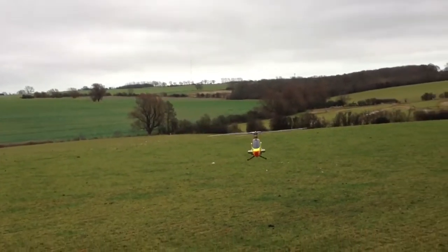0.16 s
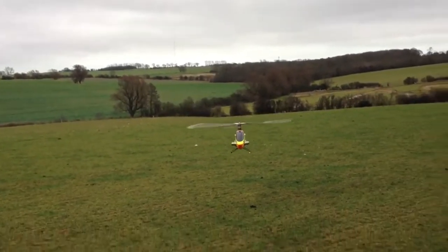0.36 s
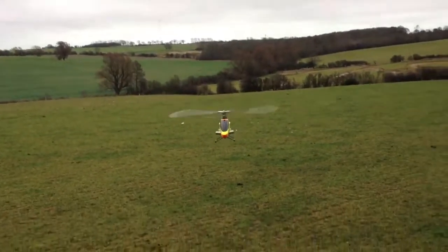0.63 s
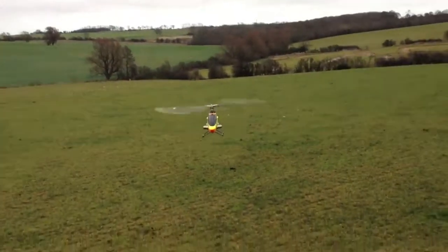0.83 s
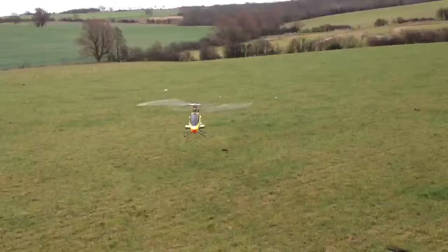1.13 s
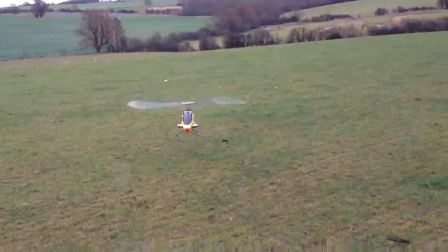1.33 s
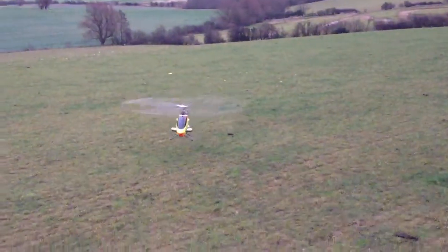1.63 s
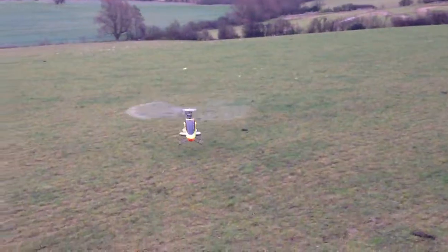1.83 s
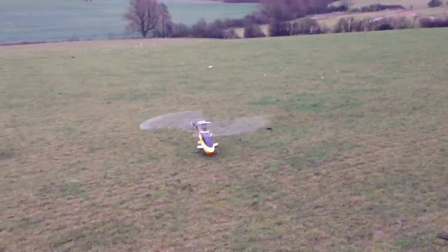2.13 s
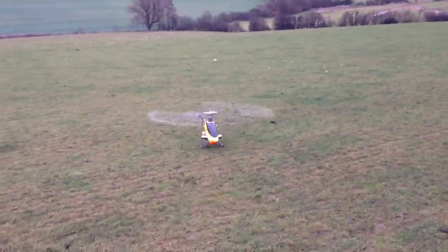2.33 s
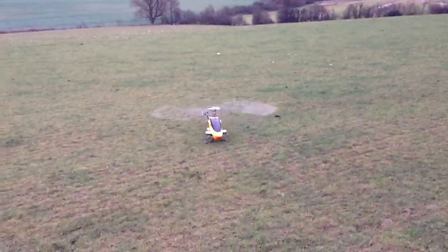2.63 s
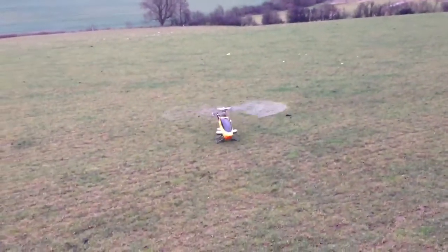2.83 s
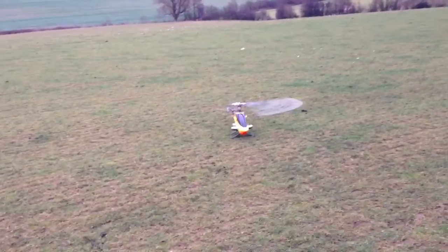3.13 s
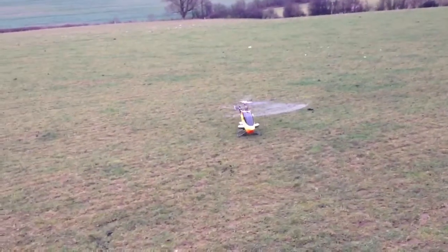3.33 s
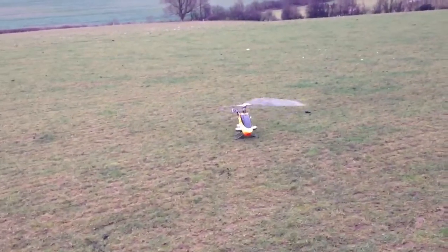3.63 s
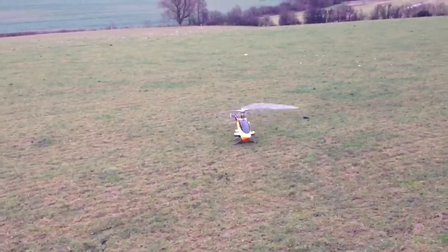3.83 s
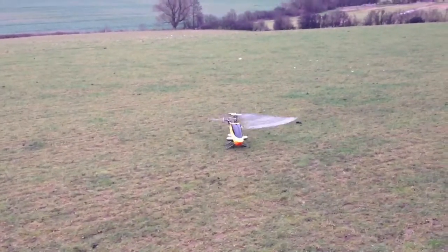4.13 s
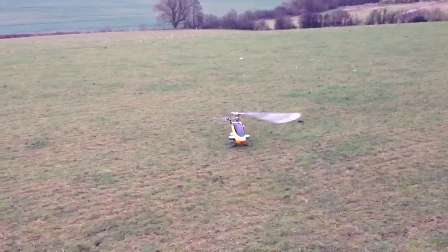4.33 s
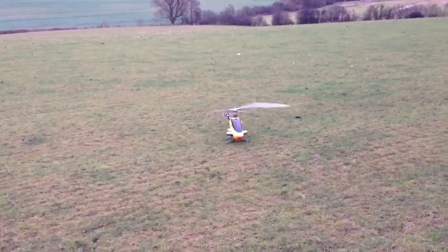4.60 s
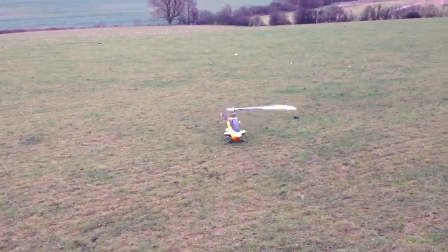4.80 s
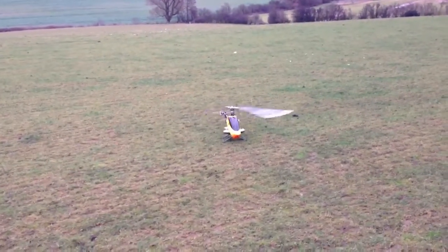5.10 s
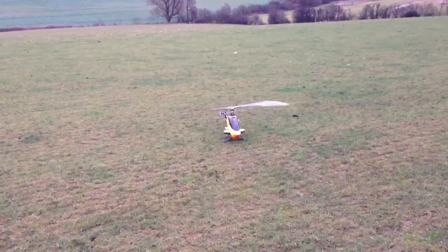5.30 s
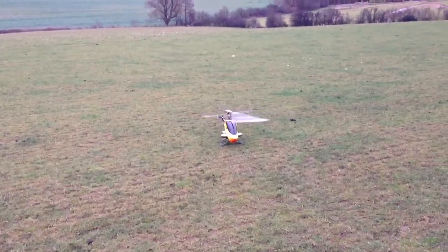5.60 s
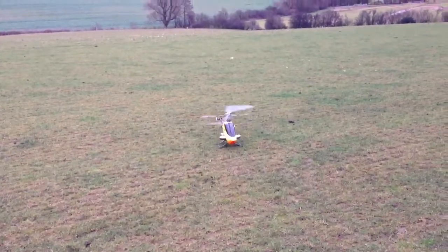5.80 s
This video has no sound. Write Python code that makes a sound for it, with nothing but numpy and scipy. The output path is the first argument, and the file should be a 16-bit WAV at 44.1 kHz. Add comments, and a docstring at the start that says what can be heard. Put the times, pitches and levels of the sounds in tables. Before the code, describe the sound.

Outdoors on an open grassy field, mono and dry, a model helicopter's turbine spools down. At 0 s a broad airy hiss is strong, carrying shrill, beading whines; the most prominent appears high and glides down, quickly in the first second, then ever more slowly. A rougher low gear whine dies by about 0.9 s. The coasting rotor gently chops the rush, slowing from roughly 65 to 25 blade passes per second, with shifting bright swishes. Around 2.6-2.9 s tiny very high pips flick past, then a short soft blade slap near 3 s. The whine swells briefly at 3-3.2 s, then is faint. Wind thumps the microphone throughout: clusters at 1.7-1.9 s, lighter until 3.4, heavy at 3.5-3.8 and 4.0-4.4 s, the sharpest crack near 4.4, where the hiss drops abruptly. To 6 s, crackly buffets and thin ticks dominate, over barely audible falling tones.

```python
"""Two turbine whines fall in pitch over a fading rush, with rotor chop and swish, wind thumps and pops.
A model helicopter's gas turbine runs down on the grass of an open field: tones locked to its two shafts,
noise for the air through its ducts, noise pulsed by the coasting two-blade rotor, short pips from its tips.
Gusty wind buffets a single microphone port: low and crackling noise, single eddies as wavelets, thin ticks."""
import sys
import numpy as np
from scipy import signal
from scipy.fft import rfft, irfft, next_fast_len
from scipy.io import wavfile
from scipy.ndimage import uniform_filter1d, map_coordinates

SR = 44100
rng = np.random.default_rng(int(sys.argv[2]) if len(sys.argv) > 2 else 0)


def materialize(psi):
    """Save the field psi as 16-bit PCM at rate SR to the path in sys.argv[1].

    A 1-D psi becomes a single channel; in a 2-D psi each row is a channel.
    """
    bounded = np.clip(np.atleast_2d(psi).T, -1, 1)
    quanta = np.round(bounded * 32767).astype(np.int16)
    wavfile.write(sys.argv[1], SR, quanta)


N = 262395
T = np.arange(N) / SR
TOP_HZ = 15450  # band limit

# air through the engine and swish of the rotor tips; both drop abruptly near 4.38 s:
# t/s, rush gain/dB, swish gain/dB, swish chop/0-1
AIR = [(0, -33, -37, 0.03), (.44, -33, -54, 0.2), (.66, -34.5, -48, 0.1), (.9, -36, -60, 0.35),
       (1.54, -38.5, -54, 0.2), (1.76, -39.5, -49, 0.4), (2.0, -39.5, -55, 0.4), (2.2, -42.5, -51, 0.2),
       (2.42, -44, -60, 0.1), (2.64, -45, -50.5, 0.17), (2.9, -44, -52.5, 0.2), (3.3, -45.5, -48.5, 0.27),
       (3.55, -45.5, -64, 0.1), (3.96, -48, -69, 0), (4.378, -53.5, -67, 0.1), (4.39, -58.5, -79, 0.1),
       (5.0, -55, -65, 0.1), (5.5, -56, -82, 0.2), (5.95, -58.5, -81, .2)]
# spectrum of the sharp wind crackle: f/Hz, density/dB
CRACKLE_SPECTRUM = [(300, 6), (600, 12), (900, 1.5), (1500, -6.5), (2500, -23.5), (4000, -31), (8000, -51)]


def amp(db):
    """Amplitude factor of a level in dB."""
    return 10 ** (np.asarray(db) / 20)


def unit(x):
    """x scaled to rms 1."""
    return x / np.sqrt(np.mean(x ** 2) + 1e-20)


def curves(rows):
    """One value per sample for each column after the time, joined linearly."""
    s, *cols = np.transpose(rows)
    return [np.interp(T, s, c) for c in cols]


def wobble(knots_per_s):
    """A smooth random curve through normal deviates."""
    knots = rng.standard_normal(int(N * knots_per_s / SR) + 4)
    return map_coordinates(knots, [T * knots_per_s])


def filtered(x, response):
    """x with its spectrum multiplied by a zero-phase response of frequency."""
    m = next_fast_len(N + 8192)
    return irfft(rfft(x, m) * response(np.fft.rfftfreq(m, 1 / SR)), m)[:N]


def shape(points):
    """Response through (Hz, dB) points on a log frequency axis."""
    f, db = np.transpose(points)
    return lambda hz: amp(np.interp(np.log(hz + 1), np.log(f + 1), db))


def steep_band(centre_hz, width_hz):
    """Response of one steep-sided resonance, peak 1."""
    return lambda hz: 1 / (1 + (2 * (hz - centre_hz) / width_hz) ** 4)


def noise(response):
    """Coloured noise of rms 1."""
    return unit(filtered(rng.standard_normal(N), response))


def wavelet(t, hz, cycles, turn):
    """A push and rebound under a Gaussian bell; turn is the phase in radians."""
    return np.exp(-(t * hz / cycles) ** 2) * np.cos(2 * np.pi * hz * t + turn)


def tone(hz, db, flutter_db, blur_hz):
    """A gliding sine; moving air scatters it into beads, faster at high pitch; silent above the band limit."""
    scatter, beats_per_khz = .3, 3  # scattered re direct; beats a second per kHz of pitch
    phase = 2 * np.pi * np.cumsum(hz + blur_hz * wobble(120)) / SR
    beats = np.cumsum(beats_per_khz * np.minimum(hz, TOP_HZ) / 1000 + 8) / SR
    in_phase, quadrature = [map_coordinates(rng.standard_normal(int(beats[-1]) + 4), [beats]) for _ in "ab"]
    beads = np.hypot(1 + scatter * in_phase, scatter * quadrature)
    flutter = amp(flutter_db * np.clip(hz / 8000, .4, 1.6) * wobble(160))
    return np.sqrt(2) * amp(db) * unit(flutter * beads) * np.sin(phase) * (hz < TOP_HZ)


def whine():
    """Tones locked to the two coasting shafts, whose periods lengthen almost steadily."""
    # run-down: t/s, compressor base tone f/Hz, power turbine blade tone f/Hz
    shafts = [(0, 8749.7, 19881.9), (.3, 7051.1, 17175), (.6, 5823.1, 15038.2), (1.05, 4575.1, 12589.2),
              (1.5, 3739.3, 10769.5), (2.2, 2873.2, 8735.1), (3.25, 2091.1, 6727), (4.3, 1613.1, 5389.4),
              (5.35, 1295.1, 4428.1), (5.95, 1154, 3982.1)]
    # t/s, compressor base level/dB, power turbine gear whine level/dB
    early = [(0, -60, -37), (.06, -41, -36), (.11, -38, -35), (.17, -50, -44), (.22, -56, -38),
             (.26, -66, -32), (.31, -66, -36), (.36, -33.5, -37), (.41, -53, -49), (.46, -52, -46),
             (.51, -66, -41.5), (.61, -62, -34.5), (.67, -68, -42), (.74, -70, -52), (.85, -80, -70),
             (1.3, -90, -85)]
    # main whines: t/s, 2x base level/dB, 4x base level/dB, blade tone level/dB
    main = [(0.18, -32, -45, -43), (0.25, -24, -45, -43), (0.32, -28, -45, -43), (0.39, -21.5, -45, -43),
            (0.46, -29, -45, -43), (0.53, -38, -45, -48), (0.6, -31, -45, -43), (0.67, -33, -45, -46),
            (0.74, -32, -45, -41), (0.81, -35, -45, -42), (0.88, -27.5, -45, -45), (0.95, -34.5, -45, -50),
            (1.02, -30, -45, -50), (1.09, -36.5, -45, -52), (1.16, -30.5, -45, -49),
            (1.23, -31.5, -45, -51), (1.3, -32.5, -45, -47), (1.37, -33, -45, -46), (1.44, -32, -47, -56),
            (1.51, -33.5, -40, -44), (1.58, -41, -46, -51), (1.65, -39, -43, -46), (1.72, -44.5, -46, -52),
            (1.79, -30, -42, -54), (1.86, -38, -47, -58), (1.93, -29, -49, -56), (2.0, -38, -34, -54),
            (2.07, -39, -41, -52), (2.14, -43.5, -48, -51), (2.21, -39, -53, -49), (2.28, -40.5, -43, -54),
            (2.35, -45, -50, -62), (2.42, -47, -63, -50), (2.49, -38.5, -64, -50), (2.56, -50, -71, -56),
            (2.63, -50, -58, -61), (2.7, -54, -72, -80), (2.77, -50, -62, -61), (2.84, -45, -55, -61),
            (2.91, -54, -58, -60), (2.98, -43, -50, -53), (3.05, -41, -53, -49), (3.12, -40, -57, -53),
            (3.19, -44.5, -56, -58), (3.26, -50, -50, -54), (3.33, -60, -58, -51), (3.45, -65, -59, -59),
            (3.6, -68, -65, -80), (3.75, -72, -61, -74), (3.9, -67, -61, -68), (4.05, -62, -56, -61),
            (4.2, -64, -59, -63), (4.35, -65, -66, -69), (4.5, -64, -71, -80), (4.65, -60, -69, -76),
            (4.8, -70, -76, -76), (4.95, -70, -74, -71), (5.1, -67, -71, -70), (5.25, -67, -73, -71),
            (5.4, -77, -80, -76), (5.55, -66, -77, -67), (5.7, -72, -75, -67), (5.85, -79, -77, -82),
            (5.93, -80, -75, -75)]
    # moments when the 2x tone cancels: t/s, length/ms, depth/dB
    dips = [(0.171, 9, 24), (0.251, 15, 24), (0.297, 4.4, 12), (0.331, 13, 11), (0.379, 16, 19),
            (0.423, 16, 11), (0.484, 7, 23), (0.539, 10, 24), (0.566, 6.5, 17), (0.61, 6, 18),
            (0.733, 12, 23), (0.819, 12, 24), (0.881, 12, 10), (0.957, 9.4, 15), (1.08, 5.9, 24),
            (1.162, 13, 18), (1.401, 55, 12), (1.573, 12, 19), (1.753, 8, 13), (1.865, 14, 24),
            (2.0, 35, 16), (2.924, 11, 24), (3.368, 17, 16)]
    # perhaps a bearing, at 2.314x base: t/s, level/dB, its octave level/dB
    bearing = [(4.4, -85, -85), (5.0, -76, -78), (5.28, -74, -77), (5.38, -63, -71), (5.5, -65, -74),
               (5.6, -59, -64), (5.7, -67, -66), (5.8, -63, -68), (5.88, -57, -66), (5.95, -55, -64)]
    # brief tones, perhaps of the same bearing: t/s, 1.543x base level/dB, 5.333x base level/dB
    brief = [(3.6, -80, -85), (3.67, -55, -83), (3.84, -57, -84), (3.9, -72, -85), (4.0, -62, -80),
             (4.1, -82, -80), (4.4, -85, -88), (4.65, -85, -82), (4.95, -85, -74), (5.1, -85, -80),
             (5.25, -88, -75), (5.4, -87, -68), (5.47, -85, -58), (5.55, -85, -62), (5.65, -85, -81),
             (5.9, -85, -70)]
    # clearer sidebands: t/s, level/dB at 3.79x, 3.922x, 5.469x, 7.01x base
    sidebands = [(3.0, -80, -85, -85, -90), (3.3, -66, -75, -76, -84), (3.45, -62, -82, -79, -84),
                 (3.6, -69, -64, -80, -67), (3.75, -66, -62, -83, -67), (3.9, -73, -60, -78, -70),
                 (4.05, -73, -70, -78, -74), (4.2, -79, -67, -78, -78), (4.35, -75, -69, -76, -79),
                 (4.5, -84, -74, -83, -86), (4.65, -79, -72, -73, -82), (4.8, -79, -77, -86, -86),
                 (4.95, -75, -75, -82, -85), (5.1, -78, -77, -80, -81), (5.25, -86, -82, -71, -77),
                 (5.4, -82, -76, -69, -78), (5.55, -82, -80, -73, -76), (5.7, -69, -85, -80, -71),
                 (5.95, -84, -80, -79, -80)]
    # weak overtones of the bearing and their sidebands: multiple of base, level/dB re rush before emergence
    faint = [(3.017, -25), (3.085, -22), (3.15, -22), (4.562, -22), (4.693, -21), (5.402, -24),
             (6.107, -23), (6.242, -22), (6.88, -24), (7.644, -30), (7.781, -29)]
    # the weak overtones show once the rush has faded: t/s, gain/dB
    emerge = [(3.0, -14), (3.6, -5), (4.4, 2), (5.95, 3)]
    fade_db, fades_per_s = 1.2, 14  # wind between engine and listener makes each main whine swell and sink
    flutter_db = 1.6  # quick shake at 8 kHz
    blur_from_s, blur_hz_per_s = 4.3, 14  # the slow blade tone grows fuzzy

    s, *speeds = np.transpose(shafts)
    # smooth run-down: polynomial through the periods
    base_hz, blade_hz = [1 / np.polyval(np.polyfit(s, 1 / speed, 7), T) for speed in speeds]
    second_db, fourth_db, blade_db = [db + fade_db * wobble(fades_per_s) for db in curves(main)]
    second_db = second_db - sum(db * np.exp(-((T - s) * 2500 / ms) ** 2) for s, ms, db in dips)
    first_db, gear_db = curves(early)

    orders = [1, 2, 4, 2.314, 4.628, 1.543, 5.333, 3.79, 3.922, 5.469, 7.01]
    levels_db = [first_db, second_db, fourth_db, *curves(bearing), *curves(brief), *curves(sidebands)]
    base_locked = sum(tone(k * base_hz, db, flutter_db, blur_hz=4.94) for k, db in zip(orders, levels_db))
    faint_db = curves(AIR)[0] + curves(emerge)[0]
    overtones = sum(tone(k * base_hz, faint_db + db + 3 * wobble(5), flutter_db=1.5, blur_hz=4)
                    for k, db in faint)
    blade_blur_hz = 3.9 + blur_hz_per_s * np.clip(T - blur_from_s, 0, None)
    blades = tone(blade_hz, blade_db, flutter_db, blade_blur_hz)
    gear = tone(.1335 * blade_hz, gear_db, flutter_db, blur_hz=26.6)
    return base_locked + overtones + blades + gear


def blade_pulse(sharp, uneven):
    """One bump per blade pass, mean 1, slowing as the rotor coasts; one of the two blades is louder."""
    pass_ms = 15.353 + 3.989 * T + .247 * T ** 2
    facing_s = 2.698  # the louder blade points at the listener
    passes = np.cumsum(1000 / pass_ms) / SR
    angle = 2 * np.pi * (passes - passes[int(facing_s * SR)])
    bump = np.exp(sharp * np.cos(angle)) * (1 + uneven * np.cos(angle / 2))
    return bump / bump.mean()


def air():
    """Engine rush through its ducts, chopped by the rotor; the tips swish and slap once per pass."""
    # rush before the ducts: f/Hz, density/dB
    rush_spectrum = [(530, -43), (900, -6.5), (1290, -4), (1670, -5), (2510, 3), (3540, -9.5), (4330, -8),
                     (5910, -7.5), (6650, -13), (7410, -9), (8440, -9.5), (9740, -16), (11000, -14.5),
                     (13400, -10.5), (15500, -27)]
    # intake and shell resonances: f/Hz, width/Hz, gain/dB
    duct_peaks = [(2356, 380, -4.5), (4390, 980, 3), (6720, 800, 4.5), (8460, 1040, 0)]
    # dips in the rush: f/Hz, width/Hz
    valleys = [(1760, 460), (3560, 1200)]
    # t/s, share taken/0-1 by each dip
    valley_depth = [(1.9, 0, 0), (2.2, .3, 0.0019), (3.4, .3, 0.1), (3.6, .05, .05), (4.37, .05, .1),
                    (4.4, .05, .4)]
    # swish before tilting: f/Hz, density/dB
    swish_spectrum = [(5000, -13), (8000, 22), (11000, 10.5), (14000, 0), (16000, -1)]
    # the swish is brighter, then duller: t/s, top gain/dB (bottom gets the opposite)
    swish_tilt = [(2.3, 3), (2.7, 9), (2.95, 6), (3.2, -3.5), (3.6, 1)]
    # blades slap their own wake: t/s, level/dB
    slap_level = [(0, -42.5), (2.2, -49.5), (2.9, -70), (2.96, -41), (3.06, -44.5), (3.15, -52), (3.6, -87)]
    # f/Hz, density/dB
    slap_spectrum = [(500, 0.5), (1100, 1.5), (2500, -8.5), (3600, -10.5), (6000, -34)]
    rush_chop = .12  # share of the rush that the rotor chops
    rush_db, swish_db, swish_chop = curves(AIR)

    def ducts(hz):
        return amp(sum(db / (1 + (2 * (hz - c) / w) ** 2) for c, w, db in duct_peaks))

    rush = noise(lambda hz: shape(rush_spectrum)(hz) * ducts(hz))
    rush *= amp(.6 * wobble(9))
    for c, w, db in duct_peaks:  # each resonance also flares on its own
        flare = amp(db - 16 + 3.2 * wobble(14))
        rush += flare * noise(steep_band(c, w))
    for (c, w), depth in zip(valleys, curves(valley_depth)):
        rush -= depth * filtered(rush, steep_band(c, w))
    rush *= 1 + rush_chop * (blade_pulse(sharp=1.27, uneven=.059) - 1)

    tilt_db = curves(swish_tilt)[0]
    swish = 0
    # bands wander separately, so the colour of the swish keeps changing
    for c, db in zip((8000, 11000, 14000), (-tilt_db, -1.5, tilt_db)):
        band = noise(lambda hz: shape(swish_spectrum)(hz) / (1 + ((hz - c) / 1500) ** 2))
        swish = swish + band * amp(db + 3.3 * wobble(35.7))
    swish = unit(swish) * (1 + swish_chop * (blade_pulse(sharp=3, uneven=.31) - 1))

    slap = unit(noise(shape(slap_spectrum)) * blade_pulse(sharp=2.5, uneven=.056))
    return amp(rush_db) * rush + amp(swish_db) * swish + amp(curves(slap_level)[0]) * slap


def gusts():
    """Gains of buffet and crackle: every gust rises, holds and dies away, adding power to the calmer wind."""
    # wind on the port between gusts: t/s, level/dB before trim, crackle/dB re that level
    calm = [(0.0, -27, -3.5), (0.4, -27.5, -21), (1.76, -22.5, -38), (2.17, -24, -16), (2.53, -23.5, -20),
            (3.12, -27, -31), (3.61, -24.5, -12), (3.98, -22.5, -12.5), (4.24, -30, -19), (4.54, -26, -4),
            (5.6, -22.5, -25), (5.95, -20.5, -8.5)]
    # start of hold t/s, hold/s, level/dB before trim, crackle/dB re that level
    gust_rows = [(0.128, 0.036, -15.5, -14), (0.186, 0.073, -20, -10), (0.35, 0.012, -19, -15),
                 (0.53, 0.043, -18.5, -16), (0.702, 0.031, -16, -14), (1, 0.015, -19, -19),
                 (1.045, 0.025, -25, -31), (1.116, 0.14, -22, -10), (1.283, 0.0087, -25, 3.5),
                 (1.344, 0.041, -21, -3.5), (1.4, 0.038, -18.5, -22), (1.475, 0.048, -26, -18),
                 (1.527, 0.021, -19, -10), (1.634, 0.023, -19, -20), (1.675, 0.06, -16, -21),
                 (1.79, 0.028, -25, -20), (1.811, 0.047, -14, -18), (1.928, 0.066, -20.5, -18),
                 (2.223, 0.031, -25, -27), (2.279, 0.032, -18.5, -29), (2.374, 0.038, -23.5, -19),
                 (2.607, 0.044, -17, -21), (2.736, 0.031, -21.5, -21), (3.35, 0.048, -22, -33),
                 (3.486, 0.078, -18.5, -25), (3.62, 0.051, -17, -11), (3.677, 0.086, -14, -13),
                 (3.882, 0.027, -17, -17), (3.91, 0.013, -29, -12), (4.062, 0.073, -14.5, -11.5),
                 (4.162, 0.02, -15, -17), (4.217, 0.11, -14, -19), (4.354, 0.035, -20, -18),
                 (4.393, 0.061, -18.5, -9.5), (4.533, 0.07, -18, -14), (4.607, 0.022, -17, -17),
                 (4.686, 0.057, -15.5, -7.5), (4.813, 0.041, -19.5, -6), (4.96, 0.1, -18, -6.5),
                 (5.045, 0.036, -19.5, -14), (5.108, 0.028, -16.5, -13), (5.18, 0.037, -16.5, -3.5),
                 (5.234, 0.027, -22, -1), (5.316, 0.076, -21, -6), (5.444, 0.051, -16.5, -28),
                 (5.504, 0.078, -17.5, -14), (5.609, 0.12, -20, -9), (5.885, 0.2, -26.5, -4)]
    rise_s, crackle_rise_s, fall_s = .014, .004, .013  # crackle sets in more sharply
    calm_db, calm_crackle_db = curves(calm)
    buffet_power = amp(calm_db) ** 2
    crackle_power = amp(calm_db + calm_crackle_db) ** 2
    for s, hold_s, db, crackle_db in gust_rows:
        fall = np.exp(-np.clip(T - s - hold_s, 0, None) / fall_s)
        slow, quick = [np.clip((T - s) / rise + 1, 0, 1) * fall for rise in (rise_s, crackle_rise_s)]
        buffet_power = buffet_power + (amp(db) * slow) ** 2
        crackle_power = crackle_power + (amp(db + crackle_db) * quick) ** 2
    return np.sqrt(buffet_power), np.sqrt(crackle_power)


def wind():
    """Eddies roll over the port in lumps above a steadier roar; strong ones can carry a sharp crackle."""
    # f/Hz, density/dB
    buffet_spectrum = [(53, -46), (90, -13), (162, 3), (285, -2), (473, -6.5), (794, -17.5), (894, -23.5),
                       (1190, -29.5), (1500, -38), (1950, -71), (3300, -120)]
    # steadier roar: f/Hz, density/dB
    roar_spectrum = [(20, -7), (40, 0.5), (80, 0.5), (130, 4), (200, 12), (350, 1), (600, -57), (1200, -68)]
    strength, sharpness = gusts()
    lumps, fine = wobble(40), wobble(110)
    buffet = unit(amp(2.4 * lumps + 2.8 * fine) * noise(shape(buffet_spectrum)))
    spikes = np.minimum(wobble(300), 1.7)
    crackle = unit(amp(.69 * lumps + 4.3 * fine + 6.5 * spikes) * noise(shape(CRACKLE_SPECTRUM)))
    roar = uniform_filter1d(strength, size=SR // 2) * noise(shape(roar_spectrum))
    return amp(-5.5) * strength * buffet + amp(-4.5) * sharpness * crackle + amp(-10) * roar


def pops():
    """Single eddies thump the port and snap with a rough broad edge; lesser snaps fall at random."""
    # strongest eddies: t/s, thump/dB, thump f/Hz, snap/dB re thump, bright edge/dB re thump
    eddies = [(0.077, -13.5, 358, -5.5, -39), (0.152, -7.5, 270, -15.5, -42), (0.201, -8.5, 235, -26, -42),
              (0.219, -12, 245, -15, -42), (0.234, -23, 293, -12, -17), (0.373, -11.5, 255, -13, -42),
              (0.533, -21.5, 304, 1, -29), (0.54, -19.5, 321, 4, -30), (0.552, -12.5, 329, -16, -42),
              (0.735, -10, 257, -10, -42), (0.754, -10.5, 260, -21, -42), (1.067, -8, 225, -34, -42),
              (1.127, -9.5, 343, -5, -42), (1.135, -9, 218, -14, -42), (1.191, -8.5, 248, -26, -42),
              (1.284, -12.5, 300, -4, -12), (1.293, -13, 270, -4.5, -22), (1.365, -7, 293, 1.5, -11),
              (1.376, -5, 295, -17, -42), (1.656, -19, 270, -28, -42), (1.675, -9, 295, -17, -23),
              (1.686, -2.5, 377, -3.5, -22), (1.696, -4, 185, -9, -42), (1.708, -6, 246, -1, -11),
              (1.811, -10, 368, -24, -30), (1.822, -16, 240, -16, -42), (1.835, -10.5, 240, -2, -42),
              (1.843, -6, 330, -9, -25), (1.846, -10, 252, 0, -29), (1.853, -10, 217, -17, -42),
              (1.86, -16, 312, -16, -42), (1.963, -6.5, 216, -23, -42), (1.972, -10.5, 250, -14, -38),
              (2.015, -13, 200, -20, -36), (2.047, -10.5, 344, -14, -42), (2.126, -12.5, 215, -11.5, -36),
              (2.154, -18, 240, -20, -36), (2.233, -13.5, 200, -25, -40), (2.254, -11, 240, -24, -40),
              (2.289, -9.5, 260, -20, -42), (2.306, -15, 260, -11, -32), (2.376, -15, 210, -13, -36),
              (2.45, -15, 260, -18, -40), (2.506, -16, 200, -14, -38), (2.53, -11, 261, -20, -40),
              (2.589, -13, 280, -24, -40), (2.629, -14, 330, -11, -34), (2.708, -15, 229, -15, -40),
              (2.764, -11, 282, -12, -34), (2.803, -17.5, 260, -13, -38), (2.903, -15.5, 240, -22, -40),
              (3.048, -9.5, 190, -26, -42), (3.121, -15, 276, -16, -40), (3.202, -13, 237, -22, -42),
              (3.294, -12.5, 258, -33, -38), (3.394, -12, 199, -22, -40), (3.466, -8.5, 313, -32, -42),
              (3.485, -2, 255, -11, -40), (3.513, -8, 280, -24, -42), (3.528, -4, 270, -15, -41),
              (3.541, -14, 217, -31, -44), (3.558, -6, 301, -19, -42), (3.577, -5.5, 316, -12.5, -38),
              (3.585, -3, 313, -20, -42), (3.633, -13, 266, -17, -42), (3.643, -9.5, 258, 4, -5),
              (3.648, -5, 273, -15, -26), (3.674, -5, 314, -13, -27), (3.687, -16, 280, -8, -42),
              (3.698, -8, 280, -10, -42), (3.711, -6.5, 215, -20, -42), (3.723, -5, 313, -14, -42),
              (3.735, -25.5, 292, 7.5, -42), (3.744, -15, 261, -1, -34), (3.75, -15, 269, -19, -42),
              (3.765, -14.5, 348, -3.5, -31), (3.925, -8, 240, -12, -30), (3.938, -16.5, 251, -4.5, -30),
              (4.026, -17, 215, -4, -30), (4.06, -12.5, 247, -6.5, -42), (4.078, -10, 238, -5.5, -35),
              (4.1, -10, 339, -12, -26), (4.104, -6, 254, -17, -26), (4.108, -9, 238, -5, -42),
              (4.12, -11.5, 317, -4, -16), (4.124, -6, 280, -11, -27), (4.131, -6.5, 305, -14, -40),
              (4.157, -14, 257, -22, -38), (4.163, -4.5, 279, -15, -40), (4.218, -1.5, 258, -7, -25),
              (4.224, -5, 246, -26, -42), (4.24, -19, 236, -18, -42), (4.245, -13.5, 256, -11, -17),
              (4.264, -10, 283, -28, -42), (4.271, -10, 262, -12, -42), (4.284, -6.5, 278, -26, -42),
              (4.293, -4.5, 256, -16, -28), (4.304, -15, 322, -9, -42), (4.315, -16, 286, -19, -42),
              (4.348, -2.5, 292, -11, -26), (4.354, -17, 278, 2, -30), (4.364, -10, 387, 1.5, -10),
              (4.37, -13, 354, -3, -25), (4.375, -1.5, 292, -3.5, -11.5), (4.381, -4, 284, -1.5, -8),
              (4.385, -16, 231, -10, -10), (4.393, -13, 254, -15, -36), (4.477, -11.5, 244, -13, -42),
              (4.582, -13.5, 378, -4, -12), (4.63, -9.5, 263, -26, -42), (4.687, -9.5, 408, -8, -22),
              (4.698, -16, 313, -12, -35), (4.705, -13.5, 216, 0, -24), (4.726, -13.5, 401, -5.5, -23),
              (4.737, -12, 246, -19, -42), (4.825, -3.5, 240, -16.5, -34), (4.968, -11, 430, -2, -14),
              (4.985, -7.5, 257, -6.5, -29), (4.988, -16, 255, -7, -33), (5.015, -12.5, 292, -22, -35),
              (5.074, -11, 318, -10, -44), (5.079, -14.5, 231, -12, -37), (5.085, -20, 232, -15, -42),
              (5.098, -9.5, 330, -14, -42), (5.104, -10, 337, -11, -36), (5.117, -10.5, 350, -7, -39),
              (5.122, -15, 291, -7, -32), (5.137, -12.5, 253, -14, -42), (5.187, -13, 237, -18, -18),
              (5.205, -5, 330, -7, -16.5), (5.217, -12, 244, -12, -19), (5.231, -12, 332, -2.5, -25),
              (5.241, -10, 290, -11, -44), (5.244, -8.5, 235, -11, -32), (5.267, -16.5, 364, -4, -19),
              (5.334, -13, 215, -13, -28), (5.36, -12, 232, -11, -29), (5.425, -18, 200, -10, -30),
              (5.457, -14, 339, -8, -42), (5.478, -12, 302, -21, -42), (5.495, -13, 320, -4.5, -30),
              (5.508, -13, 224, -19, -42), (5.518, -7.5, 241, -22, -42), (5.526, -12, 252, -14, -42),
              (5.538, -19.5, 272, 2.5, -26), (5.55, -14, 216, -27, -42), (5.639, -13.5, 298, -1, -28),
              (5.655, -16, 255, -6, -42), (5.681, -19, 344, -6, -12), (5.689, -1.5, 282, -10, -26),
              (5.719, -14, 282, -12, -19), (5.893, -13, 301, -3, -15.5)]
    snap_hz, edge_hz = 760, 1780  # nominal, detuned per eddy
    thump_cycles, ring_cycles = .42, .8  # bell width before and after the peak
    puff_db, puff_rise_s, puff_fall_s = -6, .001, .0042  # a snap trails a rough puff of air
    small_per_s, small_db, small_spread_db = 37, -6, 5.5  # lesser snaps, re crackle gain of the moment
    half = 400  # samples either side of a peak
    t = np.arange(-half, half) / SR
    sound = np.zeros(N + SR)  # runs half a window late until the return
    rough = noise(shape(CRACKLE_SPECTRUM))
    trail = amp(puff_db) * np.exp(-np.abs(t) / np.where(t < 0, puff_rise_s, puff_fall_s))
    bell_cycles = np.where(t < 0, thump_cycles, ring_cycles)

    draws = rng.uniform(-1.147, 1, (len(eddies), 3))
    for (s, db, hz, snap_db, edge_db), (turn, tune, other) in zip(eddies, draws):
        start = round(s * SR)
        thump = wavelet(t, hz, bell_cycles, np.pi * turn)
        puff = trail * rough[start - half:][:len(t)]
        snap = wavelet(t, snap_hz * (1 + .091 * tune), .56, np.pi * other) + puff
        edge = wavelet(t, edge_hz * (1 + .15 * other), 1.05, np.pi * tune)
        sound[start:][:len(t)] += amp(db) * (thump + amp(snap_db) * snap + amp(edge_db) * edge)

    sharpness = gusts()[1]
    for at, size, tune, turn in rng.uniform(0, 1, (int(small_per_s * N / SR), 4)):
        start = int(at * N)
        level = sharpness[start] * amp(small_db - small_spread_db * np.log(1.1 - size))
        snap = wavelet(t, snap_hz * (.37 + .73 * tune), .27, 2 * np.pi * turn)
        sound[start:][:len(t)] += level * snap
    return sound[half:N + half]


def ticks():
    """The sharpest eddies leave a thin bright tick, a wavelet under two thirds of a cycle wide each side."""
    # t/s, peak level/dB
    tick_rows = [(1.7074, -31), (3.6416, -28), (4.2153, -37), (4.362, -27), (4.3734, -25), (4.377, -19),
                 (4.4209, -45), (4.5062, -45), (4.5521, -45), (4.581, -39), (4.6857, -35), (4.7147, -39),
                 (4.8229, -44), (4.856, -48), (4.9651, -38), (5.1028, -39), (5.1851, -36), (5.203, -36),
                 (5.231, -44), (5.3093, -45), (5.4924, -45), (5.5109, -36), (5.5358, -41), (5.6116, -38),
                 (5.68, -36), (5.7853, -48), (5.8676, -47), (5.891, -37)]
    hz, cycles, lag_s = 3200, .64, .0006
    turns = rng.uniform(0, 2 * np.pi, len(tick_rows))
    return sum(amp(db) * wavelet(T - s - lag_s, hz, cycles, turn) for (s, db), turn in zip(tick_rows, turns))


def whistles():
    """A blade tip whistles briefly as it sweeps past: short high pips."""
    # t/s, f/Hz, peak level/dB
    pips = [(2.617, 13600, -42), (2.641, 14080, -39), (2.696, 14020, -31), (2.729, 13740, -43),
            (2.752, 15090, -34), (2.758, 13300, -40), (2.808, 14320, -40), (2.812, 13400, -41),
            (2.868, 15100, -41), (2.869, 14000, -39), (2.897, 12170, -44)]
    width_s = .0022
    return sum(amp(db) * wavelet(T - s, hz, hz * width_s, 0) for s, hz, db in pips)


def scene():
    """Sum of all layers, one channel."""
    return (whine() + air() + wind() + pops() + ticks() + whistles())[None]


def record(dry):
    """The capsule drops the deep bass, the input rounds off the strongest thumps, and the band ends sharply."""
    ceiling, hardness = .72, 5
    low_cut = signal.butter(3, 100, "high", fs=SR, output="sos")
    thin = signal.sosfilt(low_cut, dry[0])
    soft = thin / (1 + np.abs(thin / ceiling) ** hardness) ** (1 / hardness)
    return filtered(soft, lambda hz: hz < TOP_HZ)[None]


dry = scene()
out = record(dry)
materialize(out)
```